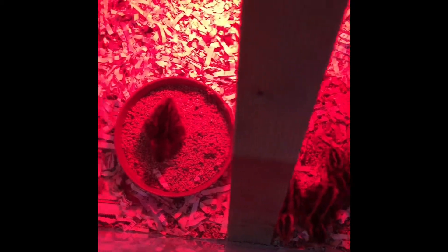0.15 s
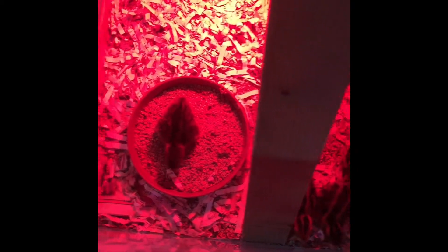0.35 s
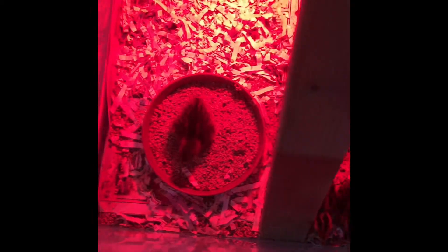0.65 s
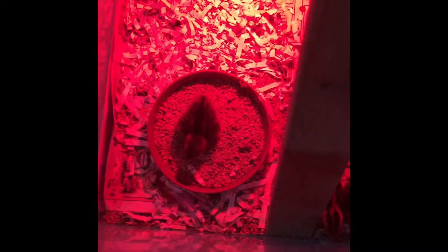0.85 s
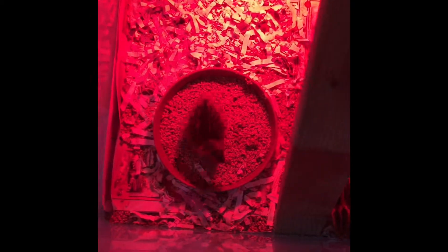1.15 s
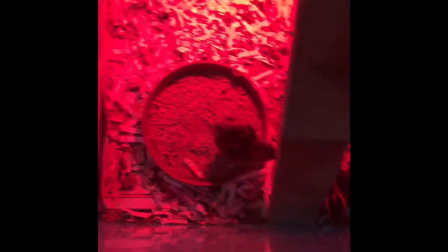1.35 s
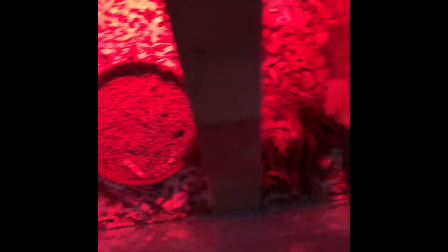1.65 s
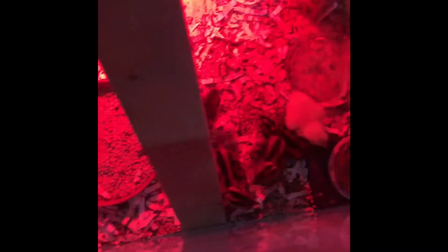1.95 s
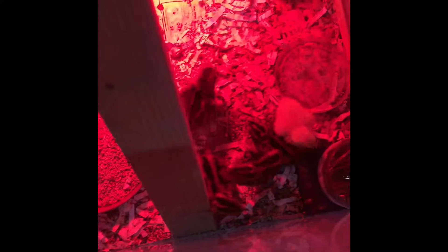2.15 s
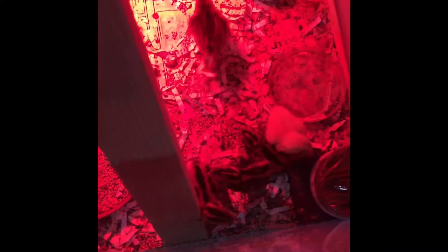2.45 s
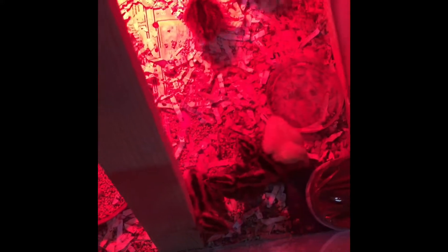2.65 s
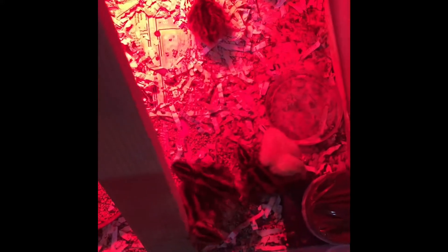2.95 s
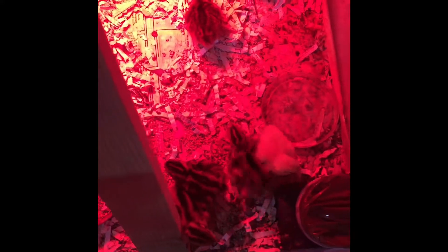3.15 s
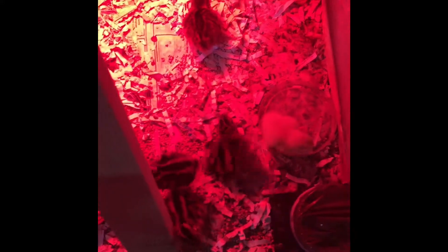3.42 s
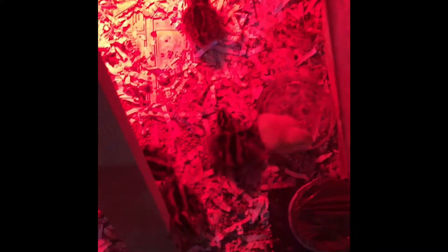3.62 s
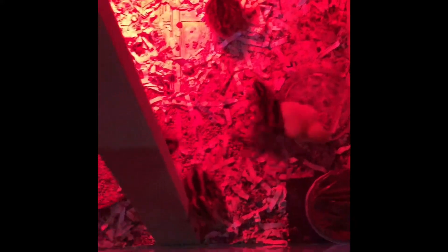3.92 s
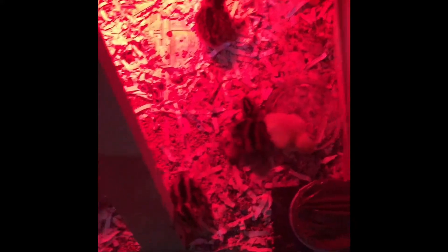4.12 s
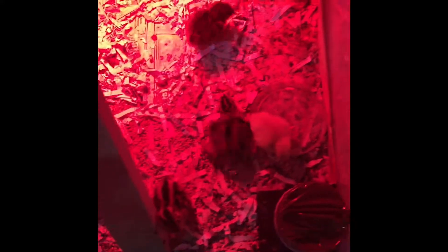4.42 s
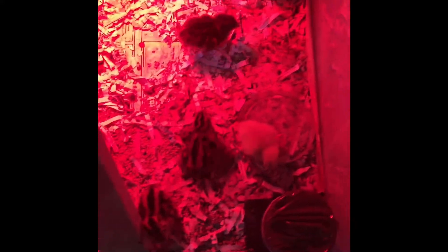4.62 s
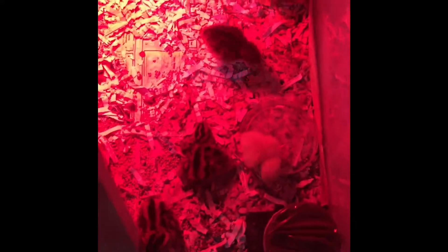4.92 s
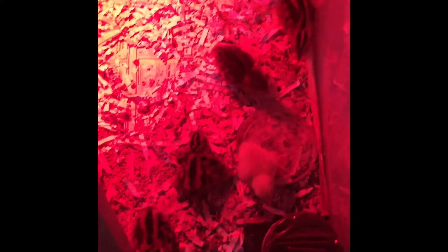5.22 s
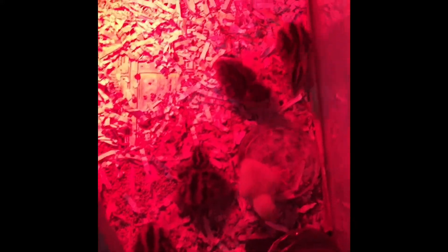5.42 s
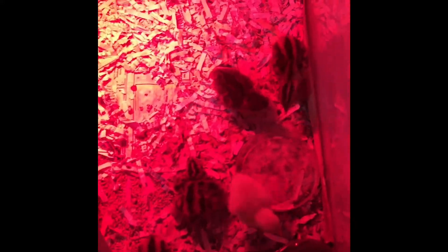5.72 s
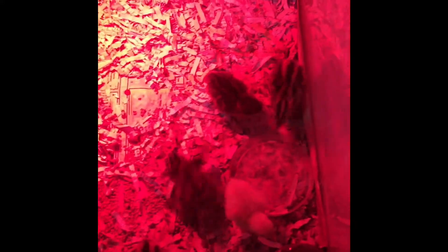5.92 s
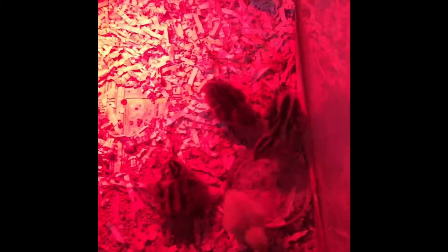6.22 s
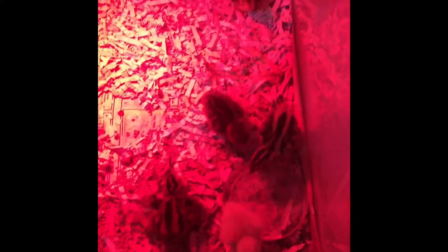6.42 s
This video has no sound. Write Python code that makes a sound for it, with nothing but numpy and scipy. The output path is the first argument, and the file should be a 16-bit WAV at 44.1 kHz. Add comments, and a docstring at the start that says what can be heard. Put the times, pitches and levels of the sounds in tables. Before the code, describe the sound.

Quail chicks peep softly and give one sharp squeal while scratching and pecking at paper bedding and bumping the walls of their box.

```python
"""Quail chicks peep softly in a brooder box, heard from just above, and one gives a sharp squeal.
Each call is a gliding, near-pure whistle from the syrinx, smeared by the close walls. Claws and beaks
scratch and peck at paper bedding, floor litter and a plastic feed dish: grainy friction and clean blows
coloured by each surface. Soft bodies bump the wall with dull, ringing knocks.
Under it all lies a quiet room with a distant house rumble."""
import sys
import numpy as np
from scipy import signal
from scipy.fft import rfft, irfft, next_fast_len
from scipy.io import wavfile
from scipy.ndimage import uniform_filter1d, map_coordinates

SR = 44100
rng = np.random.default_rng(int(sys.argv[2]) if len(sys.argv) > 2 else 0)


def transcribe(signal):
    """Save signal, clipped to [-1, 1], as a 16-bit WAV file at the path in sys.argv[1]."""
    frames = np.atleast_2d(signal).T
    limited = np.clip(frames, -1, 1)
    pcm = np.round(limited * 32767).astype(np.int16)
    wavfile.write(sys.argv[1], SR, pcm)


N = 289737


def amp(db):
    return 10 ** (np.asarray(db) / 20)


def unit_rms(x):
    return x / np.sqrt(np.mean(x ** 2) + 1e-20)


def curves(rows, t):
    """Each column after the time, read at times t."""
    times, *columns = np.transpose(rows)
    return [np.interp(t, times, column) for column in columns]


def wobble(rate):
    """A smooth random curve, rate knots a second."""
    return map_coordinates(rng.standard_normal(int(N * rate / SR) + 4), [np.arange(N) * rate / SR])


def filtered(x, response):
    """x through a complex frequency response."""
    size = next_fast_len(N + SR // 2)
    return irfft(rfft(x, size) * response(np.fft.rfftfreq(size, 1 / SR)), size)[:N]


def resonate(x, peaks):
    """x through (centre [Hz], width [Hz], gain [dB]) resonances that keep the level of white noise."""
    def body(f):
        return sum((-1) ** k * amp(db) * 1j * f * width / (hz * hz - f * f + 1j * f * width)
                   for k, (hz, width, db) in enumerate(peaks))
    return filtered(x, body) / np.sqrt(np.mean(abs(body(np.fft.rfftfreq(4096, 1 / SR))) ** 2))


def add(track, start, sound):
    """Mix a sound into a track, start seconds in."""
    at = round(start * SR)
    track[at:at + len(sound)] += sound[:len(track) - at]


# EQ of the room tone: (frequency [Hz], relative level [dB])
ROOM_EQ = [(15, -38), (25, 5.5), (208, -8), (273, -9.5), (445, -11.5), (584, -14), (669, -23),
           (1060, -40.5), (1390, -31.5), (1640, -21), (1830, -23), (13600, -35.5), (16500, -27)]
# fader ride of the house rumble: (time [s], level [dB])
RUMBLE_RIDE = [(0.0, -71), (0.66, -58), (0.97, -60), (1.53, -64), (1.77, -59), (2.3, -57), (2.51, -62),
               (3.35, -68), (3.71, -65), (4.1, -55), (4.5, -59.5), (4.63, -64.5), (5.14, -64), (5.6, -66),
               (5.95, -70), (6.24, -63.5), (6.57, -65.5)]
def room():
    """The bed: drifting room tone with microphone hiss, and a distant house rumble that swells."""
    hz, db = np.transpose(ROOM_EQ)
    tone = filtered(rng.standard_normal(N), lambda f: amp(np.interp(np.log(f + 1), np.log(hz), db)))
    rumble = resonate(rng.standard_normal(N), [(53, 10.5, 11), (152, 19, -11)])
    tone_db = -65.5 + 2.58 * wobble(2.73)
    rumble_db = curves(RUMBLE_RIDE, np.arange(N) / SR)[0]
    return amp(tone_db) * unit_rms(tone) + amp(rumble_db) * rumble


def ring(modes, t, spread_db, detune, rise_cycles):
    """Damped modes, varied in strength and pitch as every bump lands elsewhere; low ones bloom later."""
    sound = np.zeros(len(t))
    for hz, db, t60 in modes:
        decay = amp(db + spread_db * rng.normal() - 60 * t / t60)
        bloom = 1 - np.exp(-t * hz / rise_cycles)
        sound += decay * bloom * np.sin(2 * np.pi * hz * (1 + detune * rng.normal()) * t)
    return sound


# modes of the wall panel and of the whole box: (pitch [Hz], level [dB], t60 [s])
WALL_MODES = [(209.3, -10.5, 0.16), (320.2, -3, 0.11), (394, -2, 0.075), (482.5, -1, 0.055),
              (579, -3.5, 0.072), (834, 1, 0.032), (1062, 0.5, 0.0357), (1480, 1.5, 0.013),
              (1900, -0.5, 0.032)]
BOX_MODES = [(82.57, -7.5, 0.37), (119.3, 1, 0.16), (166.6, 0, 0.198)]
# bumps on the wall: (time [s], wall level [dB], boom level [dB], favoured pitch [Hz])
KNOCK_CUES = [(0.615, -42.5, -47, 786), (0.813, -35.5, -62.5, 890), (1.012, -37, -46, 304),
              (1.184, -38.5, -70, 797), (1.262, -51, -40, 834), (1.333, -55, -50, 886),
              (1.368, -39.5, -36.5, 361), (1.583, -41, -47, 385), (1.621, -27, -25.5, 272),
              (1.799, -33, -49.5, 485), (2.1, -44.5, -58, 400), (2.156, -41, -64.5, 308),
              (2.289, -45, -59.5, 815), (2.942, -48.5, -73, 495), (3.357, -46, -58.5, 616),
              (3.511, -40, -63.5, 307), (4.063, -40, -48, 330), (4.329, -38, -48, 480),
              (4.593, -39.5, -50, 400), (4.848, -38.5, -49, 400), (5.146, -38, -49, 314),
              (6.092, -46, -56, 377)]
def knocks():
    """A soft body bumps the wall: short rattling panel modes, and the box booms later and longer."""
    wall, boom = np.zeros((2, N))
    t = np.arange(SR // 2) / SR
    swell = 1 - np.exp(-t / .012)
    for start, wall_db, boom_db, favoured_hz in KNOCK_CUES:
        # the spot it hits favours nearby pitches
        modes = [(hz, db - 5 * abs(np.log2(hz / favoured_hz)), t60) for hz, db, t60 in WALL_MODES]
        add(wall, start, amp(wall_db) * ring(modes, t, spread_db=2.5, detune=.066, rise_cycles=.88))
        box = ring(BOX_MODES, t, spread_db=2, detune=.015, rise_cycles=.1)
        add(boom, start, amp(boom_db) * swell * box)
    return wall * amp(2.5 * wobble(150)) + boom * amp(1.5 * wobble(35))


def surface_envelopes(cues):
    """Lay (time, levels, shape) cues on three tracks: litter, paper, dish."""
    tracks = np.zeros((3, N))
    for start, levels, shape in cues:
        for track, db in zip(tracks, levels):
            add(track, start, amp(db) * shape)
    return tracks


# fader ride of the constant rustle: (time [s], paper [dB], litter [dB], dish [dB])
STIR_RIDE = [(0.0, -78, -79, -77), (0.29, -85, -83, -80), (0.58, -70, -64, -72), (0.75, -70, -70, -62.5),
             (1.17, -74.5, -67, -61.5), (1.45, -60, -63, -55.5), (1.77, -67, -61, -62.5),
             (2.43, -56.5, -67.5, -73), (2.91, -71.5, -74, -76.5), (3.48, -66.5, -68, -68.5),
             (3.62, -72, -75, -75.5), (4.41, -69, -70, -76), (4.83, -75, -74.5, -75),
             (5.12, -68.5, -65.5, -75.5), (5.49, -76.5, -75.5, -76.5), (6.02, -73, -74.5, -74),
             (6.33, -62, -69, -77.5), (6.57, -59, -64.5, -74.5)]
def stirring():
    """Friction envelopes of restless feet, fluttering around the ride."""
    paper, litter, dish = [amp(db + 1.5 * wobble(40)) for db in curves(STIR_RIDE, np.arange(N) / SR)]
    return np.array([litter, paper, dish])


# longer shuffles: (time [s], length [s], litter [dB], paper [dB], dish [dB])
SHUFFLE_CUES = [(.56, 0.162, -73.5, -57.5, -54.5), (0.645, 0.1435, -60, -63, -52.5),
                (0.814, 0.24, -71, -69.5, -60), (1.293, 0.139, -66, -75.5, -53),
                (1.412, 0.12, -67, -75, -61), (1.618, 0.1333, -47.5, -60, -67),
                (1.867, 0.197, -58.5, -54, -64), (3.022, 0.24, -55.5, -71, -95),
                (3.34, 0.25, -64.5, -67.5, -88), (3.733, 0.281, -74, -68.5, -93.5),
                (4.035, 0.0945, -56.5, -78, -62), (4.95, 0.19, -65, -80, -78),
                (5.052, 0.177, -57.5, -71, -65), (6.142, 0.15, -99, -82, -93),
                (6.391, 0.139, -54, -44.5, -62.5), (6.445, 0.23, -72, -53.5, -72)]
def shuffles():
    """Friction envelopes of feet pushing through the litter: each swells and fades."""
    return surface_envelopes((start, levels, np.hanning(round(length * SR)))
                             for start, length, *levels in SHUFFLE_CUES)


# soft claw strokes: (time [s], litter [dB], paper [dB], dish [dB])
SCRATCH_CUES = [(0.4545, -45, -39, -75), (0.6893, -57, -47.5, -61.5), (0.8583, -33, -34.5, -24),
                (0.987, -42, -49.5, -39), (1.0739, -30.5, -50, -28.5), (1.1203, -31, -58, -40),
                (1.1631, -36, -39, -41), (1.2797, -28.5, -34, -28), (1.299, -25, -29, -42.5),
                (1.3688, -28, -30, -43.5), (1.751, -37, -27.5, -61), (1.8805, -34, -32, -45),
                (2.029, -33.5, -24, -41.5), (2.045, -57.5, -32, -64.5), (2.2687, -50, -43.5, -52),
                (2.2856, -34, -29, -45), (2.376, -41, -50.5, -54), (2.393, -37, -26.5, -43),
                (2.4189, -34, -35.5, -46), (2.4494, -52.5, -62.5, -91), (2.593, -58, -48.5, -55),
                (2.7097, -46, -41.5, -47.5), (3.2998, -69.5, -47, -59), (3.6012, -35.5, -35.5, -53),
                (3.7668, -48.5, -74.5, -83.5), (3.911, -40, -49, -57), (3.9518, -47, -41, -68),
                (4.05, -44, -48, -44), (4.226, -43.5, -82.5, -58.5), (4.3286, -49, -49.5, -34),
                (4.559, -62.5, -61.5, -74.5), (4.586, -38.5, -45, -40), (5.0005, -53, -79.5, -74),
                (5.029, -43, -75, -50), (5.108, -34, -37.5, -40.5), (5.7399, -40, -61.5, -58),
                (5.7577, -41, -48, -48), (6.0541, -34.5, -43, -50), (6.302, -53.5, -35.5, -60),
                (6.4384, -64.5, -28, -56)]
def scratches():
    """Friction envelopes of scraping claws: a soft attack and a quick decay."""
    t = np.arange(SR // 4) / SR
    scrape = (1 - np.exp(-t / .024)) * amp(-60 * t / .07)
    return surface_envelopes((start, levels, scrape) for start, *levels in SCRATCH_CUES)


# hard pecks and snaps: (time [s], litter [dB], paper [dB], dish [dB], t60 [s])
PECK_CUES = [(0.4774, -50, -48.5, -64, 0.044), (0.5693, -46, -51, -42.5, 0.076),
             (0.615, -33, -39.5, -23.5, 0.071), (0.7362, -49, -40, -47, 0.031),
             (0.7955, -46.5, -45.5, -34, 0.075), (0.815, -39.5, -36.5, -28.5, 0.03),
             (0.874, -46, -42, -40, 0.015), (0.8936, -46, -46.5, -44, 0.027), (0.938, -68, -61, -52, 0.041),
             (0.991, -50, -45, -55, 0.02), (1.066, -60, -48, -65, 0.012), (1.036, -41.5, -54, -64, 0.017),
             (1.0826, -54.5, -48, -48, 0.012), (1.1845, -58.5, -47.5, -30.5, 0.037),
             (1.254, -37.5, -35.5, -29, 0.057), (1.3337, -36, -55, -28, 0.04), (1.35, -39, -39, -46, 0.059),
             (1.3841, -34, -40, -52, 0.0234), (1.4136, -42, -51.5, -48, 0.0115),
             (1.4314, -39, -42, -56.5, 0.013), (1.4621, -40, -40, -39, 0.0099),
             (1.5547, -50, -44, -76, 0.0133), (1.5833, -34.5, -33.5, -83, 0.1),
             (1.6194, -24.5, -35, -38, 0.046), (1.6512, -24, -40, -40, 0.013),
             (1.6551, -21, -28, -44, 0.027), (1.69, -43, -45, -81, 0.0364), (1.716, -46, -37, -77, 0.018),
             (1.912, -55, -41.5, -54, 0.076), (1.9527, -41.5, -42.5, -64, 0.036),
             (2.006, -49, -51, -72, 0.016), (2.2993, -52.5, -42, -55, 0.08),
             (2.3267, -43.5, -49, -60.5, 0.047), (2.5671, -47.5, -39.5, -55, 0.0765),
             (2.6284, -59.5, -41.5, -57.5, 0.076), (2.941, -59, -43, -62.5, 0.063),
             (3.3533, -35, -47, -43, 0.023), (3.3576, -32, -41, -42.5, 0.069),
             (3.5084, -60, -45.5, -51, 0.044), (4.1861, -59.5, -50, -64, 0.031),
             (4.532, -55.5, -47.5, -64, 0.12), (4.9196, -82, -57, -69.5, 0.042),
             (5.0821, -52, -57.5, -75, 0.056), (5.3235, -59, -62, -82, 0.0346),
             (5.349, -58, -62, -79.5, 0.0254), (5.5252, -57.5, -42.5, -79.5, 0.04),
             (5.6687, -48, -41, -59, 0.0574), (5.8085, -54, -45, -88, 0.06),
             (5.987, -67, -57.5, -78, 0.045), (6.093, -51, -27, -59, 0.0572), (6.1053, -55, -39, -60, 0.17),
             (6.2074, -81.5, -50.5, -79.5, 0.048), (6.2474, -62, -60, -78, 0.0144)]
# first contact above the peck's level: (litter [dB], paper [dB], dish [dB])
BLOW_BOOST = [15, 12, 12]
def pecks():
    """A beak strikes: friction envelopes that snap and settle, and one clean impulse at first contact."""
    t = np.arange(SR // 4) / SR
    attack = 1 - np.exp(-t / .0007)
    settling = amp(-44 - 60 * t / .11)
    snaps = surface_envelopes((start, levels, attack * (amp(-60 * t / t60) + settling))
                              for start, *levels, t60 in PECK_CUES)
    blows = np.zeros((3, N))
    for start, *levels, _ in PECK_CUES:
        blows[:, round(start * SR) + 20] = amp(np.add(levels, BLOW_BOOST))
    return snaps, blows


def crinkle(colour_db, crackles_per_s):
    """Friction noise in grains and sparse crackles; each scrap of litter colours it for a moment."""
    ticks = (rng.random(N) < crackles_per_s / SR) * rng.exponential(1, N)
    grain = amp(2.5 * wobble(600)) + 1.5 * signal.lfilter([1], [1, -.98], ticks)
    spectrum = signal.stft(rng.standard_normal(N) * grain, nperseg=512)[2]
    patches = uniform_filter1d(rng.standard_normal(spectrum.shape), size=2, axis=0)
    patches = unit_rms(uniform_filter1d(patches, size=9, axis=1))
    return unit_rms(signal.istft(spectrum * amp(colour_db * patches), nperseg=512)[1][:N])


# resonances of paper bedding, floor litter and plastic dish: (centre [Hz], width [Hz], gain [dB])
PAPER_BODY = [(4226, 970, -6.5), (5950, 1180, 3), (7760, 4270, -1.5), (9605, 1300, -0.5), (11290, 1300, -6),
              (15500, 7800, -9)]
LITTER_BODY = [(1743, 229, -4), (2064, 138, 3), (2484, 477, 2.5), (3313, 630, -1), (4075, 690, -4.5)]
DISH_BODY = [(618.9, 120, 1), (867, 183, 5), (1126, 187.5, 7.5), (1447, 212, 3.5)]
def scrabbling():
    """Friction and beak blows excite crisp paper, mid-range litter and the hollow dish."""
    snaps, blows = pecks()
    litter, paper, dish = stirring() + shuffles() + scratches() + snaps
    paper *= crinkle(colour_db=3.5, crackles_per_s=80)
    litter *= crinkle(colour_db=4.5, crackles_per_s=15)
    dish *= crinkle(colour_db=4.5, crackles_per_s=10)
    drives = blows + [litter, paper, dish]
    return sum(map(resonate, drives, [LITTER_BODY, PAPER_BODY, DISH_BODY]))


# early reflections off the box walls: (delay [s], level [dB])
WALL_ECHOES = [(.0023, -3), (.0041, -10), (.0068, -12), (.011, -16)]
def box_reflections(voice, tail_t60_s=.034, tail_db=-21.5):
    """The close walls make gliding notes beat and smear into a very short tail."""
    t = np.arange(SR // 10) / SR
    tail = rng.standard_normal(len(t)) * amp(-60 * t / tail_t60_s)
    early = filtered(voice, lambda f: 1 + sum(amp(db) * np.exp(-2j * np.pi * f * delay)
                                              for delay, db in WALL_ECHOES))
    return early + amp(tail_db) * signal.fftconvolve(voice, tail / np.linalg.norm(tail))[:N]


def whistle(times, hz, db, octave_db):
    """The syrinx glides and wavers along pitch and level points; octave_db is relative to the note."""
    t = np.arange(times[0], times[-1], 1 / SR)
    pitch, level, upper = [np.interp(t, times, points) for points in (hz, db, np.add(db, octave_db))]
    waver = 1 + .007 * unit_rms(uniform_filter1d(rng.standard_normal(len(t)), size=SR // 250))
    phase = 2 * np.pi * np.cumsum(uniform_filter1d(pitch, size=SR // 200) * waver) / SR
    tone = amp(level) * np.sin(phase) + amp(upper) * np.sin(2 * phase)
    return np.sqrt(2) * signal.windows.tukey(len(t), .15) * tone


def squeal(length_s=.071, attack_s=.015, release_s=.0063):
    """One sharp cry: the pitch falls ever slower and the octave dies early."""
    t = np.linspace(0, length_s, num=33)
    from_hz, toward_hz, fall_s = 6600, 2500, .058
    hz = toward_hz + (from_hz - toward_hz) * np.exp(-t / fall_s)
    db = -37 + np.interp(t, [0, attack_s, length_s - release_s, length_s], [-22, 0, -6, -32])
    return whistle(t, hz, db, octave_db=-550.5 * t)


# peeps and low chirrups:
# (time [s], length [s], start [Hz], middle [Hz], end [Hz], level [dB], loudest point [0-1])
PEEP_CUES = [(0.131, 0.047, 2841, 2927, 2915, -61, 0.22), (0.253, 0.075, 2740, 3120, 3100, -65.5, 0.14),
             (0.323, 0.13, 2970, 3004, 2944, -65.5, 0.13), (2.091, 0.061, 3229, 3049, 2846, -60, 0.18),
             (2.79, 0.07, 3680, 3250, 3703, -59.5, 0.4), (3.411, 0.021, 2760, 2607, 2540, -53, 0.84),
             (3.471, .048, 3050, 3033, 3040, -55.5, .55), (3.526, 0.0286, 2400, 2300, 2360, -59, .6),
             (4.084, 0.045, 2000, 2017, 2033, -61, 0), (4.088, 0.048, 4020, 4065, 4140, -58.5, .4),
             (4.578, 0.058, 3060, 3030, 2950, -62.5, 0.1), (4.598, .025, 2000, 1930, 1965, -63, .7),
             (4.992, 0.017, 2650, 2620, 2400, -56, .55), (5.022, 0.042, 2632, 2679, 2530, -63, 0.1),
             (5.14, 0.062, 4270, 4220, 4050, -61, .45), (5.177, 0.044, 2150, 2120, 2030, -61, 0.37),
             (5.477, .042, 2880, 2983, 2940, -56.5, 0.47), (5.766, 0.0186, 2120, 2030, 2095, -59, .75),
             (5.773, 0.044, 2603, 2510, 2700, -60.5, 0.38), (5.933, .065, 3100, 3220, 3040, -69.5, 0.8),
             (6.025, 0.037, 1850, 1947, 1970, -51.5, .65), (6.342, 0.0222, 2687, 2558, 2630, -60.5, 0.71),
             (6.375, 0.041, 2773, 2876, 2860, -49.5, 0.31)]
# peeps with one up-and-down wave in pitch: (the peep columns, swing [Hz])
WARBLE_CUES = [(1.769, 0.083, 2800, 2950, 3350, -59, .3, 53),
               (2.987, 0.0683, 3800, 3861, 4090, -55.5, 0.35, 333),
               (3.943, .048, 2920, 2840, 2580, -56.5, .8, 130),
               (4.357, 0.069, 2781, 2979, 2710, -54.5, 1, -170)]
# upward flicks that close some calls: (time [s], length [s], start [Hz], end [Hz], level [dB])
FLICK_CUES = [(3.429, 0.0084, 2810, 5220, -56), (3.978, 0.011, 2600, 4960, -60.5),
              (4.421, .012, 2690, 4880, -61), (6.357, 0.016, 2890, 5200, -63.5)]
def chicks():
    """The lead voices: whistled peeps, warbles, flicks and the squeal, flickering in level."""
    voice = np.zeros(N)
    progress = np.linspace(0, 1, num=17)
    peep_edge_db, warble_edge_db = -18, -4.5  # both ends of a call, against its loudest point
    calls = [(*row, 0, peep_edge_db) for row in PEEP_CUES]
    calls += [(*row, warble_edge_db) for row in WARBLE_CUES]
    for start, length, start_hz, middle_hz, end_hz, db, loudest, swing_hz, edge_db in calls:
        glide = start_hz + (end_hz - start_hz) * progress
        arch = (middle_hz - (start_hz + end_hz) / 2) * np.sin(np.pi * progress)
        hz = glide + arch + swing_hz * np.sin(2 * np.pi * progress)
        off_peak = np.interp(progress, [0, np.clip(loudest, .05, .95), 1], [1, 0, 1])
        contour_db = db + edge_db * off_peak ** 2
        add(voice, start, whistle(start + length * progress, hz, contour_db, octave_db=-24.5))
    for start, length, *hz, db in FLICK_CUES:
        add(voice, start, whistle([start, start + length], hz, [db, db + .5], octave_db=-24))
    add(voice, start=.572, sound=squeal())
    return voice * amp(2.5 * wobble(110))


def scene():
    """Mono mix: voices in the box over scrabbling, knocks and the room."""
    return (box_reflections(chicks()) + scrabbling() + knocks() + room())[None]


def record(dry):
    """The microphone drops deep bass; nothing is kept above the band limit."""
    low_cut_hz, top_hz = 36, 15850
    return filtered(dry[0], lambda f: (f < top_hz) * (1j * f / (low_cut_hz + 1j * f)) ** 4)[None]


dry = scene()
out = record(dry)
transcribe(out)
```